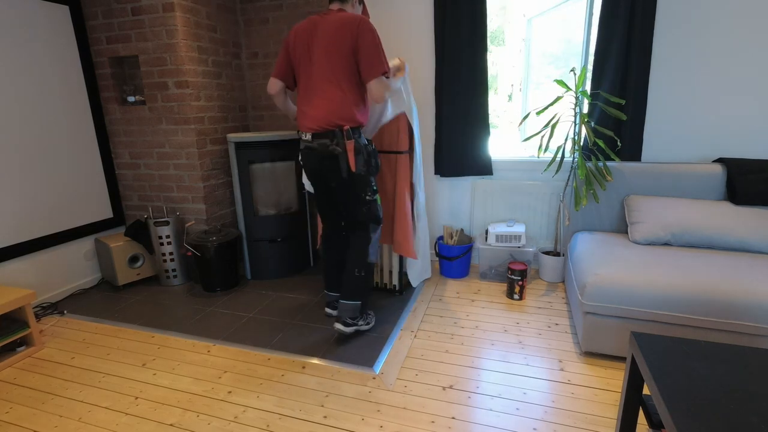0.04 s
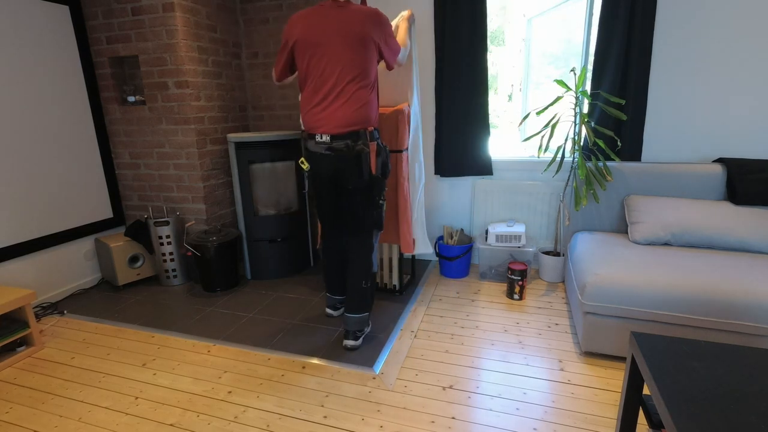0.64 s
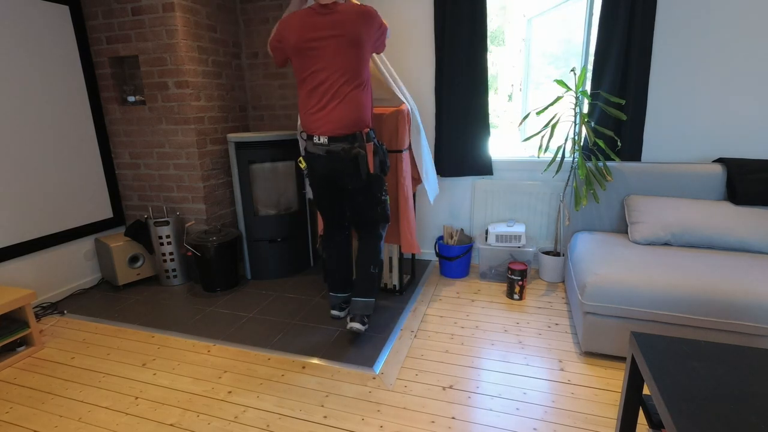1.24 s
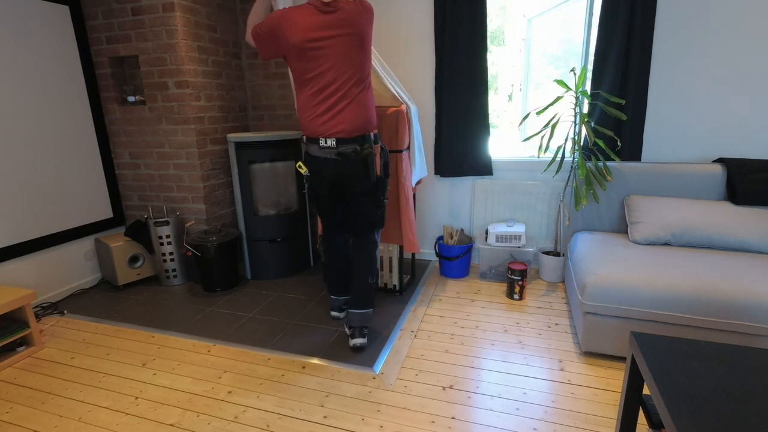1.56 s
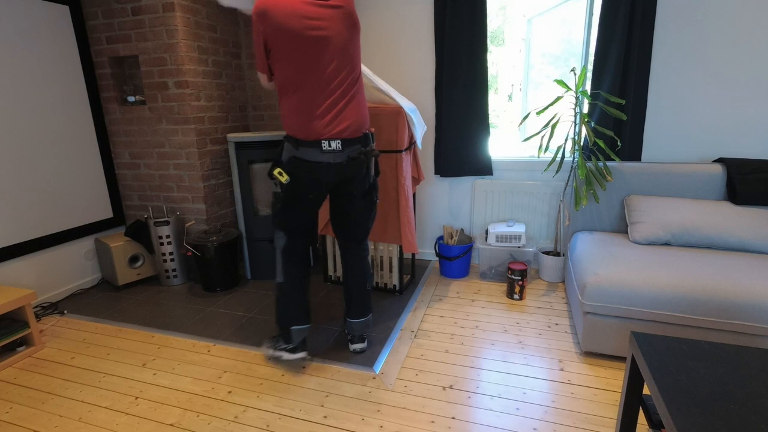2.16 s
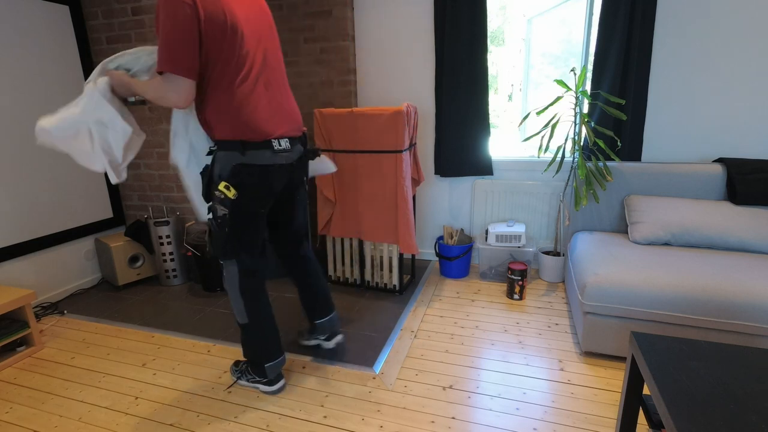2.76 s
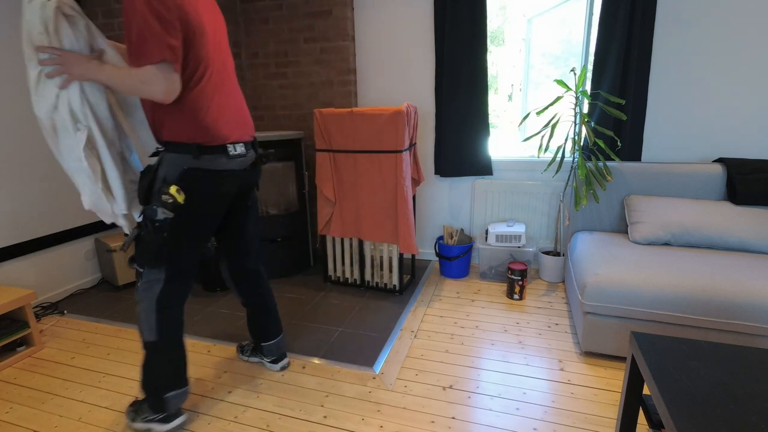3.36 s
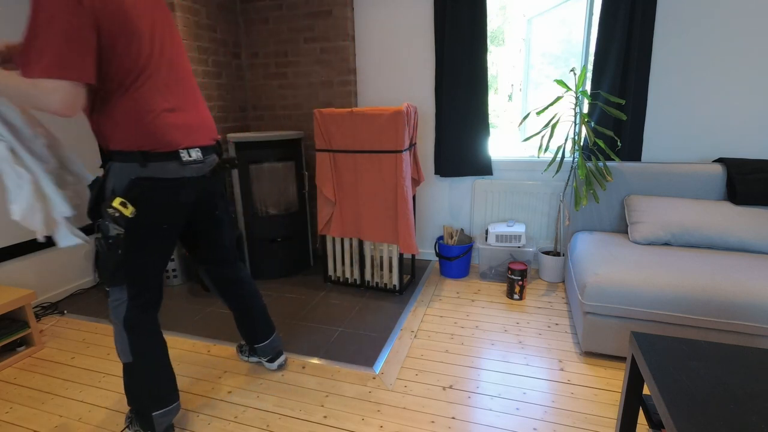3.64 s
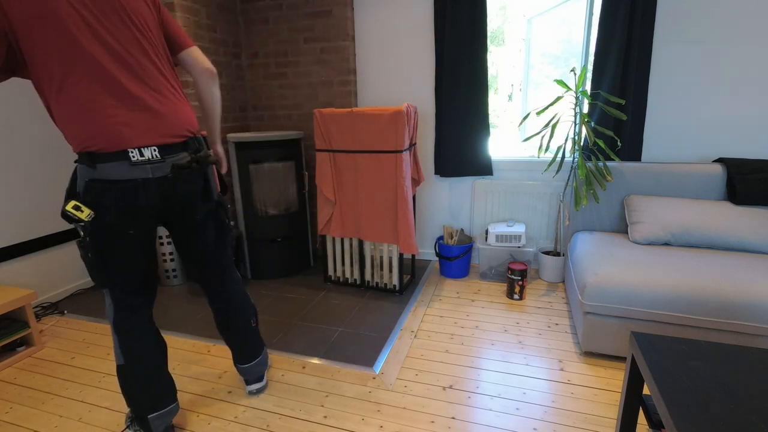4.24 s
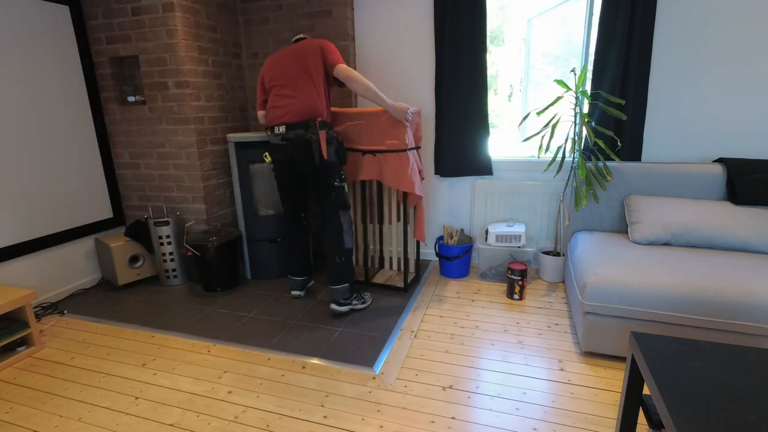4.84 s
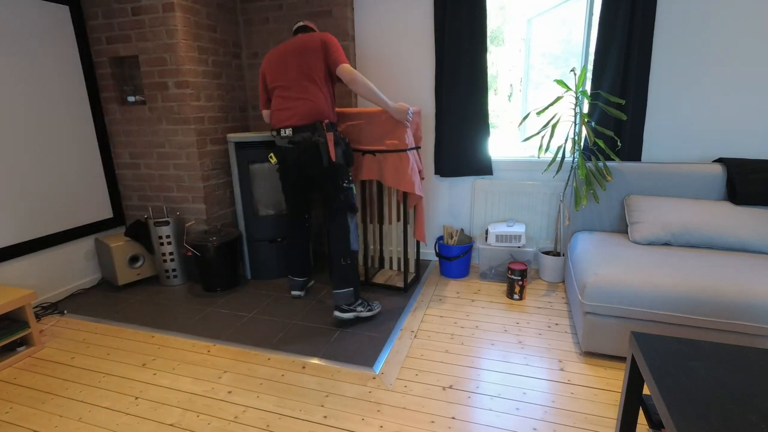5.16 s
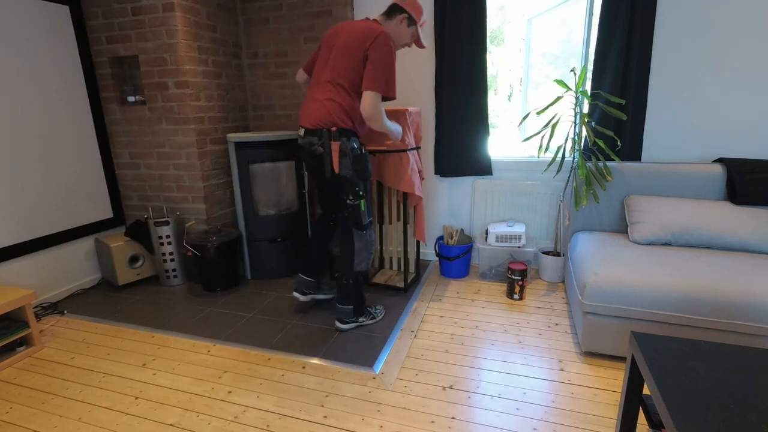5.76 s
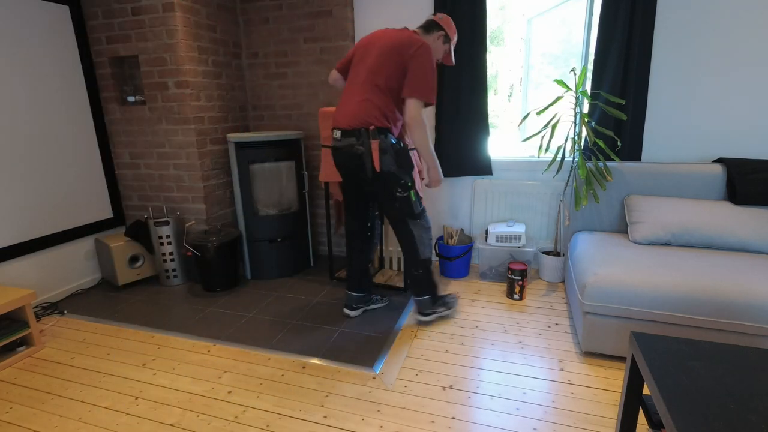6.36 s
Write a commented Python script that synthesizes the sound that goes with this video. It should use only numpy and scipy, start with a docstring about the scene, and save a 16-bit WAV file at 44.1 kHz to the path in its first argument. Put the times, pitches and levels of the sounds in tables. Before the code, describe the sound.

Shoes shuffle, squeak and thud on a hollow wooden floor as a cloth sheet swishes, with one small metal tink in a quiet room.

```python
"""A man in work shoes pulls a cloth sheet off a metal rack in a quiet living room.
First his soles shuffle on the hearth tiles and the sheet swishes; near 3 s a small metal part tinks.
He carries the sheet aside, rubber soles squeaking and thudding on the hollow plank floor.
Just after the heaviest step, at about 4.4 s, the ringing and sliding stop dead.
Then he comes back with a few soft steps and a firm last one, over the murmur of the room."""
import sys
import numpy as np
from scipy import signal
from scipy.fft import rfft, irfft
from scipy.io import wavfile

SR = 44100
rng = np.random.default_rng(int(sys.argv[2]) if len(sys.argv) > 2 else 0)


def master_out(mix):
    """Clip the mix to full scale and print it as 16-bit PCM to the path in sys.argv[1]."""
    frames = np.transpose(np.atleast_2d(mix))
    ceiling = np.clip(frames, -1, 1)
    pcm = np.round(ceiling * 32767).astype(np.int16)
    wavfile.write(sys.argv[1], SR, pcm)


N = 287091
TIME = np.arange(N) / SR
RING_TIME = TIME[:SR // 2]
STOP_S = 4.361   # the ringing and sliding stop dead here


# The walk. Each row: start in seconds, heel knock in dB, heel brightness in Hz, heel boom in dB,
# centre of that boom in Hz, roll onto the sole in seconds, sole boom in dB.
FOOTSTEPS = [(0.114, -52, 1830, -53.5, 235, 0.044, -58), (1.246, -50, 1490, -54.5, 250, 0.029, -63),
             (1.404, -52, 696, -56, 330, 0.024, -60), (2.211, -52, 1250, -56, 720, 0.051, -69),
             (2.328, -52, 796, -60, 226, 0.037, -70), (2.408, -50.5, 950, -62, 270, 0.048, -55.5),
             (2.696, -46.5, 4500, -53, 700, .028, -43), (2.708, -43, 5000, -41.5, 584, 0.024, -50),
             (2.865, -54, 1200, -57, 218, 0.039, -60), (2.968, -45, 1860, -51, 660, 0.054, -54.5),
             (3.171, -56, 2500, -71, 704, .02, -74), (3.353, -35, 3240, -30, 213, .021, -34.5),
             (3.417, -42.5, 2800, -38, 297, 0.017, -59), (3.457, -40.5, 1610, -37.5, 182, 0.02, -54),
             (3.908, -50, 1410, -62, 290, 0.056, -65), (4.066, -49.5, 1400, -54, 550, .047, -41),
             (4.129, -41.5, 1600, -37.5, 262, .014, -31.5), (4.145, -35, 1100, -42, 261, .023, -35),
             (4.206, -28.5, 1420, -33, 870, .012, -32.5), (4.229, -28.5, 1070, -22.5, 278, 0.038, -29),
             (5.180, -56, 1250, -54.5, 653, 0.02, -78), (5.311, -58, 1250, -63, 650, .02, -70),
             (5.949, -56.5, 1300, -60, 261, 0.041, -66), (6.460, -34.5, 506, -28.5, 180, .02, -41),
             (6.494, -31, 900, -46, 186, .03, -40)]

def footsteps(sole_knock_db=-7.5, sole_bright_hz=890, sole_boom_hz=268):
    """Every step is two contacts: the heel strikes, then the foot rolls onto the sole, knocking softer."""
    contacts = []
    for s, knock_db, bright_hz, boom_db, centre_hz, roll_s, sole_boom_db in FOOTSTEPS:
        contacts.append((s, knock_db, bright_hz, boom_db, centre_hz))
        contacts.append((s + roll_s, knock_db + sole_knock_db, sole_bright_hz, sole_boom_db, sole_boom_hz))
    return choked(knocks, contacts)


# Tone of a shoe striking the floor. Each row: frequency in Hz, relative level in dB.
KNOCK_EQ = [(40, -21), (100, -23.5), (170, 8), (280, 3), (450, 2), (700, -1.5), (1000, -4.5), (1400, -7),
            (1850, -14), (3200, -11.5), (4500, -22), (15000, -9)]

def knocks(contacts):
    """Each contact is a click, dull if the shoe lands softly, that fills the room and booms the planks."""
    out = np.zeros(N)
    for s, knock_db, bright_hz, boom_db, centre_hz in contacts:
        click = colour(room_response(direct_db=-3), KNOCK_EQ)
        click = unit_hit(butter(click, bright_hz, "low"))
        add(out, s, from_db(knock_db) * click + from_db(boom_db) * plank_boom(centre_hz))
    return butter(out, 75, "high")   # the knocks carry little deep bass below about 75 Hz


# Modes of the hollow plank floor. Each row: pitch in Hz, relative level in dB, t60 in seconds.
PLANK_MODES = [(89, -15, .15), (121.5, -21, .5), (173, -7.5, 0.39), (180.6, -2.5, 0.064), (206.9, 5, 0.35),
               (216.1, 3.5, 0.21), (260, 3.5, 0.096), (285.4, 3, 0.31), (309.3, -1, 0.16), (339, -3, 0.53),
               (433, -7.5, 0.18), (470, 2, 0.28), (538, 2.5, 0.15), (603, -4, 0.17), (656, -5, 0.13),
               (675, -20, 0.11), (786, -24, 0.51), (1050, -11, .2), (1117, -16, .2), (1295, 0, 0.39),
               (1520, -20, .2)]

def plank_boom(centre_hz, reach_octaves=0.28, attack_s=0.00079, uneven_db=6.5, detune=0.0082):
    """Where the weight lands decides which plank modes answer most, and pulls them slightly off pitch."""
    hz, mode_db, t60 = np.transpose(PLANK_MODES)[:, :, None]
    hz = hz * (1 + detune * rng.standard_normal(hz.shape))
    strength = from_db(mode_db + uneven_db * rng.standard_normal(hz.shape))
    strength /= 1 + (np.log2(hz / centre_hz) / reach_octaves) ** 2
    signs = (-1) ** np.arange(len(hz))[:, None]
    modes = signs * strength * ring(hz, t60)
    attack = 1 - np.exp(-RING_TIME / attack_s)
    return unit_hit(modes.sum(axis=0) * attack)


# Scuffs along the floor. Each row: start in seconds, level before the trim in dB,
# swell in seconds, hold in seconds.
SOLE_SCUFFS = [(0.077, -55, .07, .05), (0.544, -53.5, 0.076, 0.089), (1.16, -68, 0.049, .01),
               (2.23, -52, 0.037, .025), (2.355, -50.5, .08, 0.025), (2.856, -48.5, 0.043, .01),
               (2.948, -52, 0.038, 0.14), (3.241, -51, .025, .01), (3.35, -41, .01, 0.11),
               (3.437, -35.5, 0.031, 0.037), (3.91, -46.5, 0.037, .17), (4.091, -29, 0.048, 0.12),
               (4.262, -35.5, 0.014, .06), (4.473, -57.5, .07, .02), (5.188, -59, 0.036, .01),
               (5.4, -56, 0.031, 0.089), (5.951, -47.5, 0.048, 0.017), (6.046, -51.5, 0.058, 0.031),
               (6.318, -56.5, 0.032, .09)]
# Tone of a rubbing sole. Each row: frequency in Hz, relative level in dB.
SOLE_EQ = [(15, -72), (50, -11), (100, -16), (180, 1.5), (290, 0.5), (400, -2.5), (650, -3.5), (1000, -8.5),
           (1400, -11), (1850, -27), (3300, -19), (5000, -34.5), (15000, -42)]

def shuffle(trim_db=-4.0, wobble_db=1):
    """Rubber soles catch and slip on the floor."""
    rub = rms_one(colour(friction(slips_per_s=350, spread_db=4.0, hiss_db=-6.5), SOLE_EQ))
    power = stir(busy_db=-56.5, calm_db=-73.5) ** 2
    power += sum(stroke(*scuff, fade_db_per_s=189) ** 2 for scuff in SOLE_SCUFFS)
    return rub * np.sqrt(power) * from_db(trim_db + wobble_db * drift(per_s=35))


# Sheet and trousers sliding. Each row: start in seconds, level in dB, swell in seconds,
# hold in seconds, sheen in dB (how much a fast, light slide lifts the treble).
CLOTH_SWISHES = [(0.05, -59, 0.1, .05, -3), (0.52, -51.5, 0.13, .06, -9), (1.25, -61.5, 0.073, 0.14, 2),
                 (1.45, -59.5, 0.04, 0.028, 3.5), (1.735, -55, 0.027, 0.019, 10),
                 (2.18, -60.5, 0.026, 0.16, -9), (2.86, -60.5, .03, .01, -13), (3.02, -62, 0.037, .06, -12),
                 (3.15, -58, 0.023, 0.0093, -18), (3.372, -43.5, 0.049, .022, -0.5),
                 (3.90, -68, 0.018, 0.37, 6), (4.05, -51, 0.051, .04, -2.5), (4.11, -42, 0.066, 0.017, -6),
                 (4.20, -42.5, .035, 0.027, -5), (4.28, -49.5, 0.02, 0.016, 0), (5.40, -66, 0.092, .2, -3),
                 (6.05, -63.5, .07, .02, 0), (6.461, -46, 0.054, 0.023, -5)]
# Tone of the fabric. Each row: frequency in Hz, relative level in dB.
CLOTH_EQ = [(100, -44), (1200, 6), (1900, -6.5), (2700, -0.5), (3500, 1), (4500, -4), (6000, 0),
            (10000, -0.5), (15500, 2)]

def cloth(flutter_db=1, sheen_hz=7000):
    """Fabric slides with a fine hiss, each swish with its own brightness."""
    hiss = rms_one(colour(friction(slips_per_s=3700, spread_db=2.5, hiss_db=-1.0), CLOTH_EQ))
    top = butter(hiss, sheen_hz, "high", order=1)
    body = hiss - top
    body_power = stir(busy_db=-68, calm_db=-79) ** 2
    top_power = body_power.copy()
    for *slide, sheen_db in CLOTH_SWISHES:
        gain = stroke(*slide, fade_db_per_s=157)
        body_power += gain ** 2
        top_power += (gain * from_db(sheen_db)) ** 2
    swishes = body * np.sqrt(body_power) + top * np.sqrt(top_power)
    return swishes * from_db(flutter_db * drift(per_s=50))


# Sharp little accents. Each row: start in seconds, level in dB.
FLICKS = [(0.78, -66), (1.408, -60), (2.067, -61), (2.366, -61), (2.699, -54.5), (2.712, -53), (2.725, -64),
          (3.037, -60.5), (4.149, -46.5), (6.496, -57)]

def flicks():
    """A flick of cloth or grit under the sole sends a bright tick into the room."""
    out = np.zeros(N)
    for s, level_db in FLICKS:
        tick = colour(room_response(direct_db=-9), CLOTH_EQ)
        add(out, s, from_db(level_db) * unit_hit(tick))
    return out


# Soles catching as they slide. Each row: start in seconds, level in dB, length in seconds,
# first pitch in Hz, last pitch in Hz, roughness in Hz.
SOLE_SQUEAKS = [(0.141, -53.5, .05, 678, 697, 69.6), (3.399, -46.5, 0.056, 2400, 3214, 600),
                (4.064, -46, 0.052, 540, 537, 80), (4.236, -44, .025, 1063, 1150, 122),
                (4.703, -63.5, 0.095, 1500, 3160, 1210), (6.498, -57, 0.0072, 6570, 6630, 400)]

def squeaks(rows):
    """Rubber sticks and slips: a rough, gliding tone that swells and fades in the room."""
    out = np.zeros(N)
    for s, level_db, length_s, first_hz, last_hz, rough_hz in rows:
        progress = np.clip(RING_TIME / length_s, 0, 1)
        phase = 2 * np.pi * np.cumsum(first_hz + (last_hz - first_hz) * progress) / SR
        # slow noise smears the tone into a narrow band
        real, imag = butter(rng.standard_normal((2, len(RING_TIME))), rough_hz, "low")
        swell = np.maximum(np.sin(np.pi * progress), 0) ** 0.48 * (progress < 1)
        tone = swell * (real * np.cos(phase) + imag * np.sin(phase))
        heard = signal.fftconvolve(tone, room_response(direct_db=5.5))
        add(out, s, from_db(level_db) * unit_hit(heard))
    return out


# The metal part's modes. Each row: start in seconds, peak in dB, pitch in Hz, t60 in seconds.
METAL_MODES = [(3.079, -49, 8900, 0.12), (3.079, -59, 3620, 0.13), (3.079, -61, 2900, 0.08)]

def metal_tink():
    """A small piece of metal rings briefly with a few high modes."""
    out = np.zeros(N)
    for s, peak_db, hz, t60 in METAL_MODES:
        heard = signal.fftconvolve(ring(hz, t60), room_response(direct_db=0, graininess=0.63))
        add(out, s, from_db(peak_db) * heard / np.abs(heard).max())
    return out


def weight_shifts(count=18, per_s=3, knock_db=-65, bright_hz=900, boom_db=-66.5, boom_hz=212):
    """Faint shifts of weight nudge the planks at loose intervals, each with its own force and spot."""
    times = (np.arange(count) + rng.random(count)) / per_s
    contacts = []
    for s in times:
        force_db, spot_octaves = rng.normal(0, 2), rng.normal(0, 0.16)
        centre_hz = boom_hz * 2 ** spot_octaves
        contacts.append((s, knock_db + force_db, bright_hz, boom_db + force_db, centre_hz))
    return choked(knocks, contacts)


# The bed of room tone. Each row: frequency in Hz, relative level in dB.
ROOM_TONE_EQ = [(25, -47), (50, -19), (100, -9.5), (180, -0.5), (270, 0), (450, -6), (900, -11.5),
                (1400, -14), (1900, -17), (3000, -18.5), (3550, -14.5), (4500, -18.5), (8000, -18.5),
                (16000, -18.5)]

def room_tone(murmur_db=-59, whine_db=-78, whine_hz=13150, waver_hz=90):
    """A low murmur with a soft hiss on top, and a faint, thin whine."""
    waver = butter(rng.standard_normal(N), waver_hz, "low")
    whine = rms_one(waver * np.sin(2 * np.pi * whine_hz * TIME))
    murmur = rms_one(colour(rng.standard_normal(N), ROOM_TONE_EQ))
    return from_db(murmur_db) * murmur + from_db(whine_db) * whine


# The living room's short reverb. Each row: frequency in Hz, t60 in seconds.
ROOM_DECAY = [(100, 0.42), (300, 0.38), (1000, 0.37), (3000, 0.29), (12000, 0.085)]

def room_response(direct_db, graininess=0.75):
    """The direct sound, then uneven reflections that die away octave by octave."""
    size = len(RING_TIME)
    reflections = rng.standard_normal(size) * np.exp(graininess * rng.standard_normal(size))
    spectrum, hz = rfft(reflections), np.fft.rfftfreq(size, 1 / SR)
    octave = np.round(np.log2(np.maximum(hz, 125) / 125))
    response = np.zeros(size)
    for k in np.unique(octave):
        band = irfft(spectrum * (octave == k), size)
        response += band * 1000. ** (-RING_TIME / at_hz(ROOM_DECAY, 125 * 2 ** k))
    response /= np.linalg.norm(response)
    response[0] += from_db(direct_db)
    return response


def friction(slips_per_s, spread_db, hiss_db):
    """Countless tiny slips of uneven size over a smooth hiss, blurred by the room."""
    slips = (rng.random(N) < slips_per_s / SR) * rng.choice([-1, 1], N)
    sizes = from_db(spread_db * np.minimum(rng.exponential(1, N), 4))
    rubbing = rms_one(slips * sizes) + from_db(hiss_db) * rng.standard_normal(N)
    return signal.fftconvolve(rubbing, room_response(direct_db=1))[:N]


def stroke(s, level_db, swell_s, hold_s, fade_db_per_s):
    """Envelope of one slide: it swells, holds and dies away, unless the dead stop ends it."""
    swell = np.sin(np.pi / 2 * np.clip((TIME - s) / swell_s, 0, 1)) ** 2
    fading_s = np.maximum(TIME - s - swell_s - hold_s, 0)
    gain = swell * from_db(level_db - fade_db_per_s * fading_s)
    return gain * stop_gate() if s < STOP_S else gain


def stir(busy_db, calm_db):
    """Gain of constant small movements: busy while he handles the sheet, calm after the stop."""
    return from_db(calm_db + (busy_db - calm_db) * stop_gate())


def stop_gate():
    """A gate that shuts in one millisecond at the stop."""
    return np.clip((STOP_S - TIME) / .001, 0, 1)


def choked(play, rows):
    """Play the rows; those begun before the stop are choked there, later ones ring out."""
    early = play([row for row in rows if row[0] < STOP_S])
    late = play([row for row in rows if row[0] >= STOP_S])
    return early * stop_gate() + late


def ring(hz, t60):
    """One struck mode: a sine that falls 60 dB in t60 seconds."""
    return np.sin(2 * np.pi * hz * RING_TIME) * 1000. ** (-RING_TIME / t60)


def drift(per_s):
    """A smooth random wander of unit rms."""
    points = rng.standard_normal(2048)
    return rms_one(np.interp(TIME * per_s, np.arange(len(points)), points))


def colour(x, eq, size=8192):
    """Minimum-phase EQ, so that nothing sounds ahead of its attack."""
    gains = from_db(at_hz(eq, np.fft.rfftfreq(size, 1 / SR)))
    cepstrum = irfft(np.log(gains))
    cepstrum[1:size // 2] *= 2
    cepstrum[size // 2 + 1:] = 0
    impulse = irfft(np.exp(rfft(cepstrum)))[:size // 2]
    return signal.oaconvolve(x, impulse)[:len(x)]


def butter(x, hz, kind, order=2):
    """Causal low- or high-pass."""
    return signal.sosfilt(signal.butter(order, hz, kind, fs=SR, output="sos"), x)


def at_hz(points, hz):
    """Read a table along a log-frequency axis."""
    table_hz, values = np.transpose(points)
    return np.interp(np.log(np.maximum(hz, 1)), np.log(table_hz), values)


def from_db(db):
    """Decibels to gain."""
    return 10 ** (np.asarray(db) / 20)


def rms_one(x):
    """Scale to unit rms."""
    return x / np.sqrt(np.mean(x ** 2) + 1e-20)


def unit_hit(x):
    """Scale a hit as if its energy lay in 50 ms of unit rms."""
    return x / np.sqrt(np.sum(x ** 2) / (.05 * SR))


def add(track, s, sound):
    """Mix a sound in at s seconds."""
    start = min(round(s * SR), N - 1)
    track[start:start + len(sound)] += sound[:N - start]


def scene():
    """Feet, cloth and a tink of metal over the room tone, in mono."""
    feet = footsteps() + weight_shifts() + choked(squeaks, SOLE_SQUEAKS) + shuffle()
    return (feet + cloth() + flicks() + metal_tink() + room_tone())[None]


def record(dry):
    """A steep low-pass takes off the air above 15.8 kHz."""
    return signal.sosfilt(signal.ellip(12, .1, 80, 15800, fs=SR, output="sos"), dry)


dry = scene()
out = record(dry)
master_out(out)
```